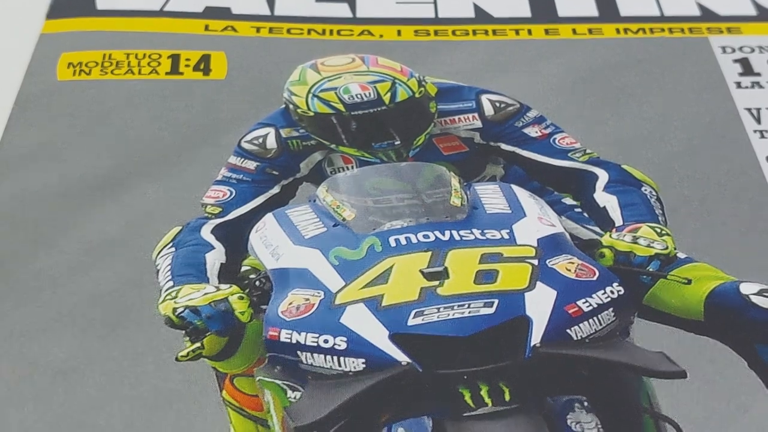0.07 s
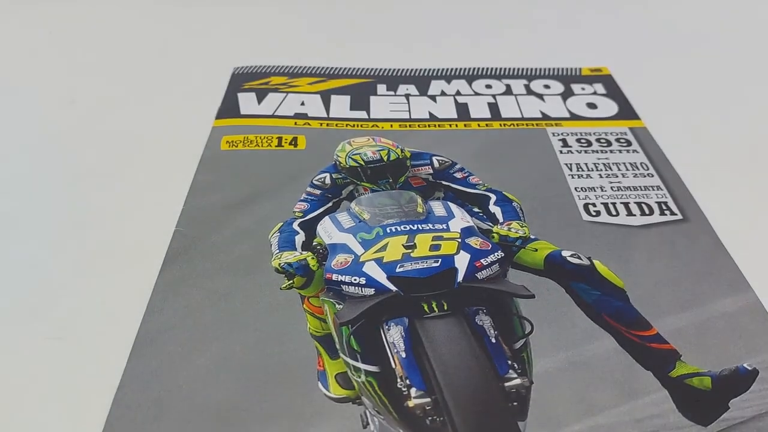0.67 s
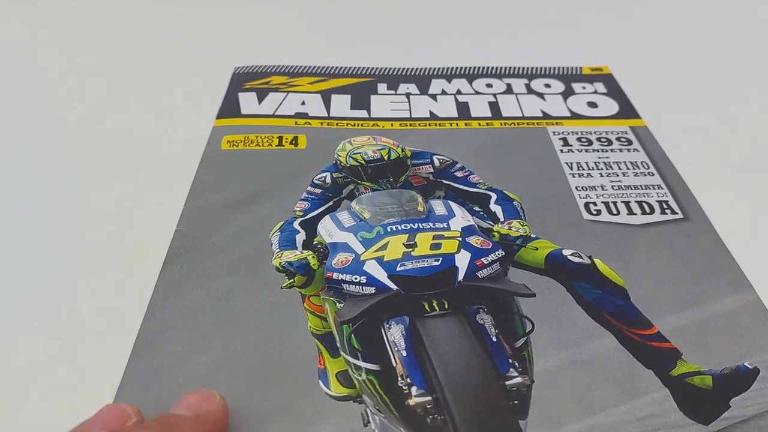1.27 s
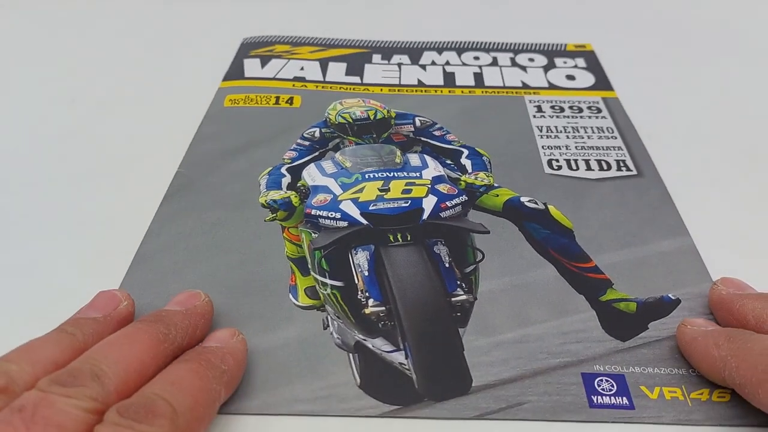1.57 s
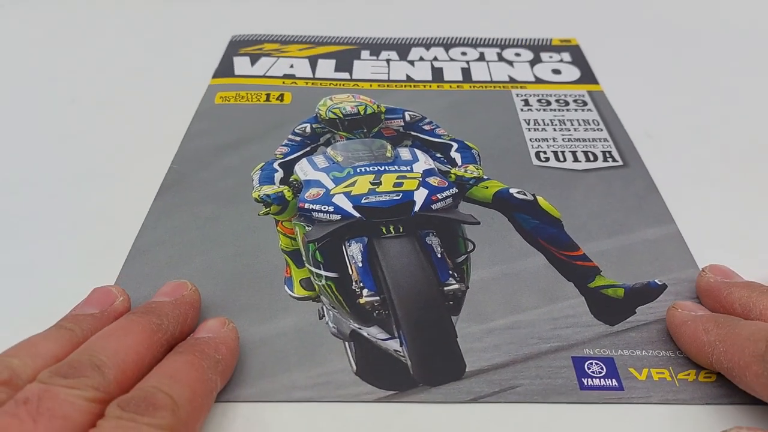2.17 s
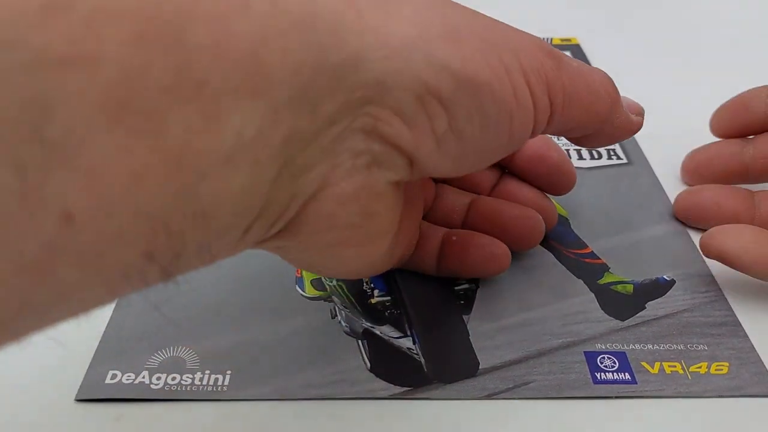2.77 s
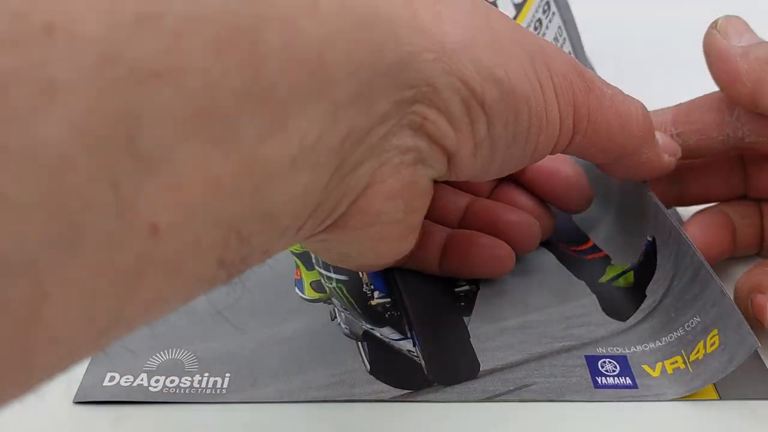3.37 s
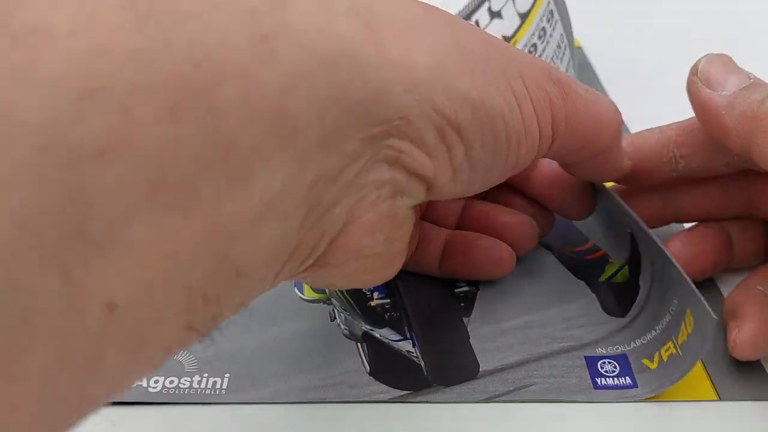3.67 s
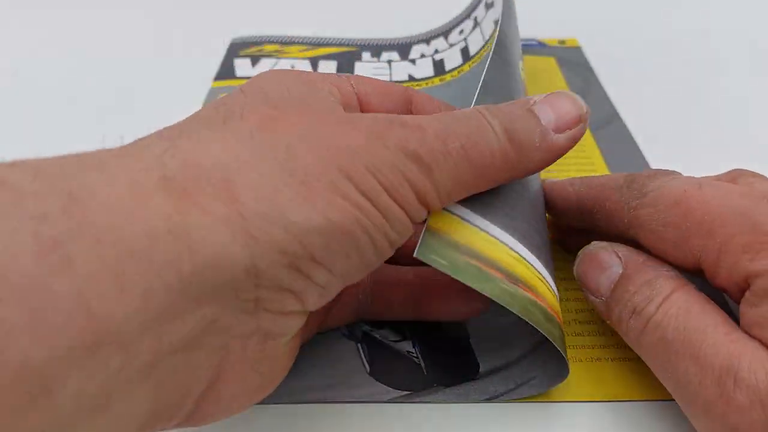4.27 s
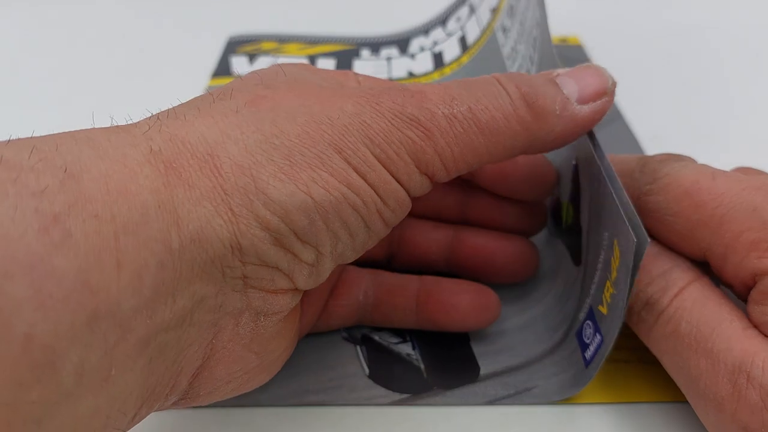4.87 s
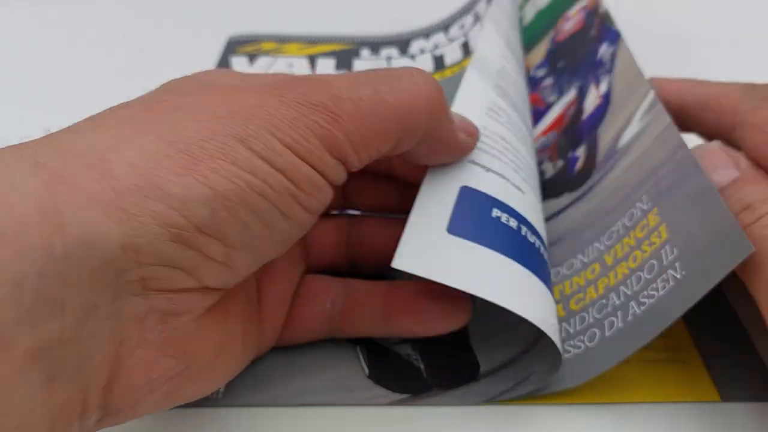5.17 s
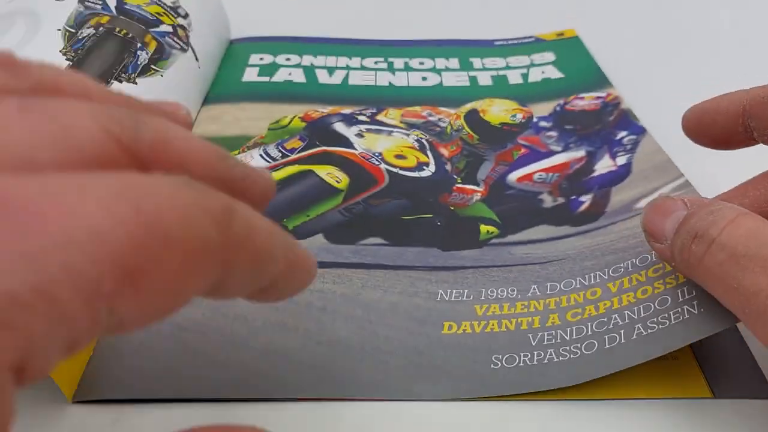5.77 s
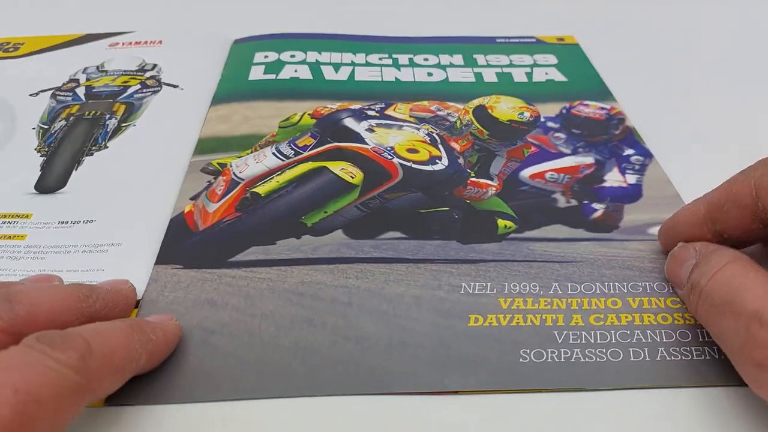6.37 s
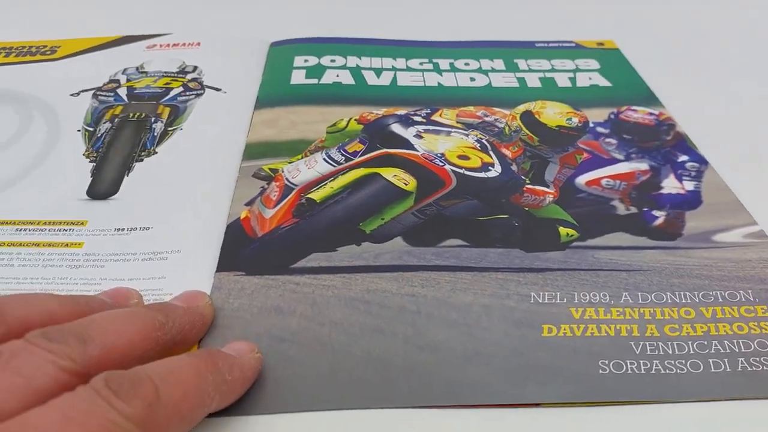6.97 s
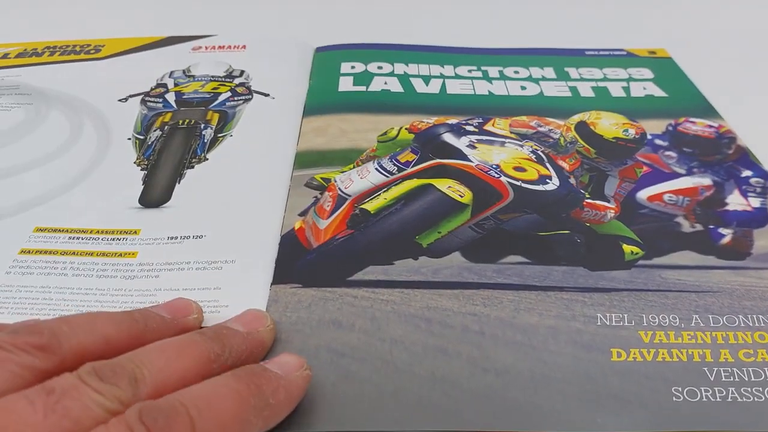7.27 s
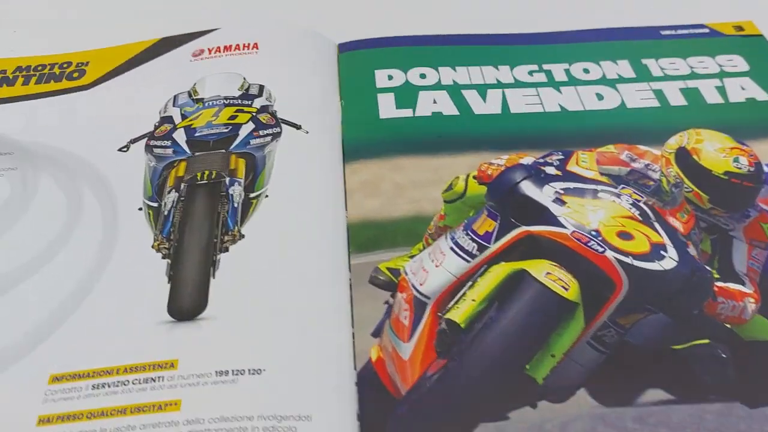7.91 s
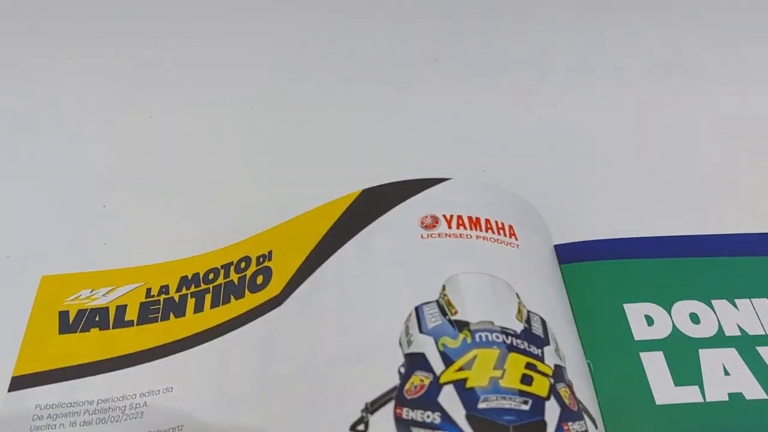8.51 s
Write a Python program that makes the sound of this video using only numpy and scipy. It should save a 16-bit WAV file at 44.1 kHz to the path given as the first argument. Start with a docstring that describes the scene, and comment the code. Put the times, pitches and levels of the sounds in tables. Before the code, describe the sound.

Hands slide over a glossy magazine and fold its cover open, with crisp crackles, papery flaps and soft table bumps.

```python
"""A small room, where a glossy magazine lies on a table close to two microphones.
Hands slide it into place, lift the stiff cover, bend it over and smooth it down. Stick-slip friction
makes skin hiss on the gloss and paper drag on the table. Buckling makes the sheet snap and flap,
and its edge ticks; each impulse excites damped modes. The hands bump the table top into low
vibration, over quiet air and a faint mains hum."""
import sys
import numpy as np
from scipy import signal
from scipy.fft import rfft, irfft, next_fast_len
from scipy.io import wavfile
from scipy.ndimage import uniform_filter1d

SR = 44100
rng = np.random.default_rng(int(sys.argv[2]) if len(sys.argv) > 2 else 0)


def store_wav(level_fs):
    """Save 16-bit WAV to argv[1]."""
    pcm = np.round(np.clip(np.atleast_2d(level_fs), -1, 1) * 32767)
    wavfile.write(sys.argv[1], SR, pcm.T.astype(np.int16))


N = 385786
TIME = np.arange(N) / SR
BODY_HZ, CRISP_HZ = 1135, 1980   # body tilts the two octaves below the first, crispness all above the second


def from_db(db):
    """Amplitude ratio of a level in decibels."""
    return 10 ** (np.asarray(db) / 20)


def unit_energy(x):
    """Normalisation of each channel to the energy of a unit impulse."""
    return x / np.sqrt(np.sum(x ** 2, axis=-1, keepdims=True) + 1e-20)


def panned(x, pan_db):
    """Level difference between the channels: pan is left minus right."""
    return x * from_db([[pan_db / 2], [-pan_db / 2]])


def add(out, s, sound):
    """Superposition of a sound that starts at time s."""
    start = round(s * SR)
    out[:, start:start + sound.shape[-1]] += sound[..., :N - start]


def colour(x, spectrum, body_db=0, crisp_db=0):
    """Minimum-phase (causal) filtering by a spectrum whose ends are tilted in dB per octave."""
    size = 2 * next_fast_len(x.shape[-1] // 2 + 2048)
    hz = np.maximum(np.arange(size // 2 + 1) * SR / size, 1)
    points_hz, points_db = np.transpose(spectrum)
    db = np.interp(np.log(hz), np.log(points_hz), points_db)
    db += body_db * np.clip(np.log2(BODY_HZ / hz), 0, 2)
    db += crisp_db * np.maximum(np.log2(hz / CRISP_HZ), 0)
    cepstrum = irfft(np.log(from_db(db)))[:size // 2]
    cepstrum[1:] *= 2
    return irfft(rfft(x, size) * np.exp(rfft(cepstrum, size)))[..., :x.shape[-1]]


def wander(rate, size):
    """Random modulation: interpolated Gaussian values, rate new ones a second."""
    return np.interp(np.arange(size) * rate / SR, np.arange(size // 8), rng.standard_normal(size // 8))


def stereo_noise(size, apart_hz=1300):
    """Coherence at spaced microphones: white noise, alike in the bass and unrelated in the treble."""
    mid, side = rng.standard_normal((2, size))
    lowpass = signal.butter(1, apart_hz, fs=SR)
    side = side - 0.21 * signal.lfilter(*lowpass, side)
    mid = mid + (np.sqrt(2) - 1) * signal.lfilter(*lowpass, mid)
    return np.array([mid + side, mid - side]) / np.sqrt(2)


# Spectrum of the room's background: (frequency [Hz], level [dB])
AIR_SPECTRUM = [(28, -68.5), (46, -30.5), (70, -43), (100, -36), (170, -51), (300, -52), (550, -64),
                (1000, -67), (3500, -78), (15000, -65)]


def room_air(hum_hz=100.2, hum_db=-65.5, swell_db=3, swells_per_s=2.8):
    """Ambient noise: hiss, rumble and mains hum, with slow amplitude modulation of the bass."""
    hum = from_db(hum_db) * np.sqrt(2) * np.sin(2 * np.pi * hum_hz * TIME)
    air = colour(stereo_noise(N), AIR_SPECTRUM) + hum
    bass = signal.lfilter(*signal.butter(1, 200, fs=SR), air)
    return air + bass * (from_db(swell_db * wander(swells_per_s, N)) - 1)


def reverberation(x, t60=0.17, db=-14.5):
    """Absorption in a furnished room leaves a weak diffuse tail that decays exponentially."""
    t = TIME[:SR // 2]
    tail = stereo_noise(len(t)) * from_db(-60 * t / t60) * (t > .008)
    tail = signal.lfilter(*signal.butter(1, 7000, fs=SR), unit_energy(tail))
    return from_db(db) * signal.fftconvolve(x, tail, axes=1)[:, :N]


# Reflections from nearby surfaces such as the table top and the hands: (left delay [s], right delay [s], gain
# [ratio])
REFLECTIONS = [(.0073, .0061, .22), (.0127, .0143, -.17)]


def early_reflections(x):
    """Interference with delayed copies comb-filters the sound differently at each microphone."""
    out, gains = x.copy(), [1]
    for *delays, gain in REFLECTIONS:
        out += gain * np.array([np.pad(side, (round(s * SR), 0))[:N] for side, s in zip(x, delays)])
        gains.append(gain)
    return out / np.linalg.norm(gains)


# Bearing of the moving paper: (time [s], lead of the left microphone [s])
LEFT_LEAD = [(1.4, -.0002), (4.2, .00018), (5.1, .00014), (5.5, .0004), (5.95, .00034), (6.25, .00006)]


def arrival_delay(x):
    """Path difference: the nearer microphone hears first, as the cover swings from right to left."""
    lead = np.round(SR * np.interp(TIME, *np.transpose(LEFT_LEAD))).astype(int)
    return np.array([x[0], x[1, np.clip(np.arange(N) - lead, 0, N - 1)]])


# Hands bump the table: (time [s], level [dB], frequency [Hz], T60 [s])
TABLE_BUMPS = [(0.907, -39.5, 59, 0.33), (1.368, -30.5, 48.3, 0.5), (1.415, -31, 100, 0.22),
               (2.396, -37, 90, .1), (2.601, -41, 53, 0.26), (5.517, -30, 106, 0.11),
               (5.935, -46.5, 83.5, 0.28), (6.449, -36.5, 59.3, 0.14), (6.832, -47, 75.4, 0.22),
               (7.403, -36, 112, 0.16), (7.474, -36, 68.5, 0.26), (7.535, -41, 55, 0.35),
               (8.201, -34, 105, 0.062)]


def table_bumps(rise=0.0048):
    """Damped free vibration: a soft hand sets the table top swinging at one low frequency."""
    out, t = np.zeros((2, N)), TIME[:SR // 2]
    onset = 1 - np.exp(-(t / rise) ** 2)
    for s, db, hz, t60 in TABLE_BUMPS:
        add(out, s, from_db(db - 60 * t / t60) * onset * np.sin(2 * np.pi * hz * t))
    return out


def snap(t, rise, t60, click_share=0.18, sharp_s=0.003, grain_db=2.0):
    """Impulsive excitation: a click, stronger for a quick rise, then scattered bending waves."""
    envelope = np.minimum(t / max(rise, 1 / SR), 1) ** 2 * from_db(-60 * np.maximum(t - rise, 0) / t60)
    waves = unit_energy(stereo_noise(len(t)) * envelope * from_db(grain_db * wander(910, len(t))))
    click = np.sinc((t - .0003) * SR)
    share = np.clip(click_share * np.exp(-rise / sharp_s), 0, 1)
    return np.sqrt(share) * click + np.sqrt(1 - share) * waves


def ringing(t, modes, rise):
    """Modal superposition: damped sinusoids, each with its own phase at each microphone."""
    decay_time = np.maximum(t - rise, 0)
    tones = 0
    for hz, db, t60 in modes:
        phase = 2 * np.pi * hz * t + np.pi * rng.random((2, 1))
        tones += from_db(db - 60 * decay_time / t60) * np.sin(phase)
    return tones * np.minimum(t / max(rise, 1 / SR), 1)


# Spectrum of a crack at the cover's edge: (frequency [Hz], level [dB])
EDGE_SPECTRUM = [(30, -31), (200, -28.5), (2500, -17), (3300, -30), (4500, 4), (5600, -4.5), (7800, 1.5),
                 (10000, -3), (15000, -9)]
# Modes of the edge: (frequency [Hz], level [dB], T60 [s])
EDGE_RESONANCES = [(3750, -43, .04), (4700, -40, .05), (5400, -38, .05), (6450, -41, .09),
                   (7900, -40, .055)]
# Ticks of the edge: (time [s], level [dB], T60 [s], pan [dB])
EDGE_TICKS = [(2.524, -3, 0.13, -1), (2.546, -12, .08, 3), (2.8717, 9, 0.051, 0)]


def edge_ticks(rise=0.00067):
    """Impulse response of the stiff edge: a bright crack leaves high modes ringing briefly."""
    out, t = np.zeros((2, N)), TIME[:SR // 3]
    for s, db, t60, pan_db in EDGE_TICKS:
        tick = colour(snap(t, rise, t60), EDGE_SPECTRUM) + ringing(t, EDGE_RESONANCES, rise)
        add(out, s, from_db(db) * panned(tick, pan_db))
    return out


# Spectrum of a snap in the sheet: (frequency [Hz], level [dB])
SHEET_SPECTRUM = [(25, -44), (170, -16.5), (270, -12), (430, -7.5), (700, -7.5), (1300, -3), (2000, -6),
                  (3000, -4.5), (4800, -3), (15000, -6)]
# Modes of the bent sheet: (frequency / ring pitch [ratio], level [dB], T60 [s])
BENT_SHEET_MODES = [(.82, -42, .07), (1, -36, .075), (1.13, -41, .06), (1.47, -44, .05), (2.05, -44, .04)]
# Mode of the stack of pages: (frequency [Hz], level [dB], T60 [s])
STACK_KNOCK = [(252.5, -57.5, 0.093)]


def sheet_jolt(rise, t60, body_db, crisp_db, ring_hz, ring_db):
    """Transient response: the paper snaps, its curve rings hollow and the pages below knock."""
    t = TIME[:SR // 3]
    modes = [(ratio * ring_hz, db, decay) for ratio, db, decay in BENT_SHEET_MODES]
    hollow = from_db(ring_db) * ringing(t, modes, rise)
    crack = colour(snap(t, rise, t60), SHEET_SPECTRUM, body_db, crisp_db)
    return crack + hollow + ringing(t, STACK_KNOCK, rise)


def crinkles(start, end, db, count=18):
    """Local buckling: tiny kinks form at random times as the cover bends."""
    out, t = np.zeros((2, N)), TIME[:SR // 10]
    for when, size, side in rng.random((count, 3)):
        kink = colour(snap(t, rise=0, t60=.05), SHEET_SPECTRUM)
        add(out, start + when * (end - start), from_db(db) * (.5 + size) * panned(kink, 10 * (side - .5)))
    return out


# Fingers pat the pages flat: (time [s], level [dB], crispness [dB/octave], pan [dB])
FINGER_PATS = [(0.888, -12, -2, 0), (0.939, -8, -5, -2), (0.996, -8.5, -7, -3), (1.397, -5, -8, 3),
               (1.411, -6, -9, -3), (5.816, -6, 3, 1.5), (5.992, -3.5, -1, 2), (6.23, 0.5, -1.5, 2.5),
               (6.2367, 7, -2.5, 0.5), (6.441, -15.5, 2, 2), (7.409, -20, -24, 5), (7.457, -14.5, 2, 0),
               (8.19, -8, -5, 2)]


def finger_pats():
    """Air displacement: soft fingers press a slow, full-bodied puff from under a page."""
    out = np.zeros((2, N))
    for s, db, crisp_db, pan_db in FINGER_PATS:
        puff = sheet_jolt(rise=0.0057, t60=0.12, body_db=8, crisp_db=crisp_db, ring_hz=1039, ring_db=-10)
        add(out, s, from_db(db) * panned(puff, pan_db))
    return out


# Kinks in the bent cover: (time [s], level [dB], body [dB/octave], crispness [dB/octave],
# ring pitch [Hz], ring level [dB], pan [dB])
COVER_KINKS = [(1.436, -3.5, -6, -3.5, 1170, -3, -4), (2.608, -4, -11, 4, 2610, -7, 3),
               (2.9351, 4, -0.5, 0.5, 2120, -1, -1), (2.9416, 3, 1.5, -0.5, 1650, -3.5, 0),
               (3.156, -7.5, -11, -3, 1730, -1, 1), (3.4295, -3, -12, -1, 1515, -6, -1),
               (3.778, 0, 4, -3.5, 1190, -9.5, -1), (4.2274, 9.5, -9, -4, 1265, -6, 4.5),
               (4.232, 8, -7, -0.5, 1460, 2, -2.5), (4.912, -10.5, -4, -1.5, 1206, -7, 0.5),
               (4.942, -8, -4, -1.5, 1400, -14, 0), (5.1015, 4.5, -21, 0, 1390, -8, 2),
               (5.115, 3, -2.5, -0.5, 1390, -13, 1), (5.4784, 6, -13, -4.5, 1790, -9, 4),
               (5.517, 0, 10, -2.5, 1520, -5, -2)]


def cover_kinks(rise=0.00096, t60=0.072):
    """Snap-through buckling: the cover jumps through a small kink with a short, crisp crack."""
    out = np.zeros((2, N))
    for s, db, *timbre, pan_db in COVER_KINKS:
        add(out, s, from_db(db) * panned(sheet_jolt(rise, t60, *timbre), pan_db))
    return out


# A wide part of the sheet flaps over or lands:
# (time [s], level [dB], rise [s], T60 [s], ring pitch [Hz], ring level [dB])
SHEET_FLAPS = [(4.3172, 10.5, 0.0004, 0.068, 1400, -8), (4.421, 15, 0.0005, 0.08, 1150, -8.5),
               (4.8448, -15.5, 0.00074, 0.15, 1130, 4.5), (5.318, 2.5, 0.00033, 0.12, 1040, -0.5),
               (5.485, 6.5, 0.011, 0.11, 1060, -14), (5.516, 12.5, 0.00095, 0.17, 413, -4.5),
               (5.533, 9, 0.012, 0.16, 1245, -4), (5.553, 14, 0.015, 0.2, 922, -7),
               (5.615, 6, 0.024, 0.18, 1040, -6.5), (5.927, 1, 0.0035, 0.092, 910, -2),
               (8.699, -4, 0.003, 0.37, 990, 7)]


def sheet_flaps(body_per_doubling=4.5, neutral_t60=0.1, dulling_per_s=457, top_hz=4040):
    """Radiation from a wide sheet: longer ringing goes with more body, slower contact with less treble."""
    out = np.zeros((2, N))
    for s, db, rise, t60, ring_hz, ring_db in SHEET_FLAPS:
        body_db = body_per_doubling * np.log2(t60 / neutral_t60)
        crisp_db = -10.5 - dulling_per_s * rise
        add(out, s, from_db(db) * sheet_jolt(rise, t60, body_db, crisp_db, ring_hz, ring_db))
    return signal.lfilter(*signal.butter(2, top_hz, fs=SR), out)


# A dragged sheet or fingertip rasps: (start [s], end [s], level [dB], pitch [Hz], nominal width [Hz])
SLIDING_RASPS = [(1.852, 1.878, -72, 2400, 300), (1.92, 2.07, -64, 1450, 700),
                 (3.068, 3.103, -55, 4610, 400), (3.104, 3.14, -53, 2560, 346),
                 (3.94, 4.069, -51.5, 1400, 400), (4.528, 4.68, -62.5, 1143, 130),
                 (5.257, 5.299, -43, 4170, 1300), (5.93, 6.0, -40, 1348, 300),
                 (6.036, 6.084, -47, 2200, 600), (6.761, 6.87, -57.5, 330, 200),
                 (6.8, 7.17, -54.5, 2030, 70), (7.369, 7.437, -55.5, 4050, 177),
                 (7.69, 7.83, -57, 250, 130), (8.2, 8.54, -42.5, 1680, 500),
                 (8.269, 8.345, -42.5, 4420, 1500), (8.35, 8.535, -40.5, 2380, 250),
                 (8.438, 8.507, -35.5, 6460, 1200), (8.452, 8.517, -39, 4580, 1000),
                 (8.699, 8.766, -46, 840, 298)]


def rasps(waver=0.0178, spread=0.63):
    """Friction drives one resonance of a free span of paper: narrow-band noise of straying pitch."""
    out = np.zeros((2, N))
    for start, end, db, hz, width in SLIDING_RASPS:
        size = max(round((end - start) * SR), 1024)
        lowpass = signal.butter(1, spread * width / 2, fs=SR, output="sos")
        amplitude = signal.sosfilt(lowpass, stereo_noise(size) + 1j * stereo_noise(size))
        pitch = hz * (1 + waver * wander(17.7, size))
        band = np.real(amplitude * np.exp(2j * np.pi * np.cumsum(pitch) / SR))
        add(out, start, from_db(db) * np.sqrt(size) * unit_energy(band) * signal.windows.tukey(size, .5))
    return out


def hand_echo(x, gain=0.54):
    """Moving comb filter: the hand reflects the rubbing from a changing distance."""
    delays = [.0022 + .0004 * wander(7, N) for side in x]
    echo = np.array([np.interp(TIME - delay, TIME, side) for side, delay in zip(x, delays)])
    return (x + gain * echo) / np.sqrt(1 + gain ** 2)


# Resonances of the rubbed sheet: (frequency [Hz], bandwidth [Hz], gain [ratio])
SPAN_MODES = [(1300, 350, 0.058), (2300, 330, .15), (4630, 1100, 0.15)]


def free_spans(x, swing_db=5, changes_per_s=9):
    """Changing boundary conditions: resonances come and go as fingers pin and free spans of the sheet."""
    out = x.copy()
    for hz, width, gain in SPAN_MODES:
        swing = from_db(swing_db * np.tanh(wander(changes_per_s, N)))
        out += gain * swing * signal.lfilter(*signal.iirpeak(hz, hz / width, fs=SR), x)
    return out


# Strokes of the hands and the sliding sheet:
# (start [s], speeding up [s], slowing down [s], skin level [dB], drag level [dB], shudder level [dB])
HAND_STROKES = [(0.03, 0.19, 0.081, -61, -54, -63), (0.55, 0.25, 0.14, -44.5, -52, -47.5),
                (0.91, 0.055, 0.1, -40, -46, -42), (1.035, 0.048, 0.058, -35.5, -45, -48),
                (1.16, 0.2, 0.1, -42, -47.5, -48.5), (1.35, 0.089, 0.19, -36, -38.5, -35),
                (1.929, 0.075, 0.082, -54, -56, -48), (2.04, 0.48, 0.08, -54.5, -56.5, -50),
                (2.44, 0.17, 0.092, -48, -46, -35.5), (2.62, 0.14, 0.27, -49.5, -49, -37.5),
                (2.9, 0.25, 0.34, -54.5, -47, -44.5), (3.33, 0.05, 0.48, -56, -48.5, -44),
                (3.69, 0.048, 0.12, -52.5, -45.5, -39.0), (3.86, 0.09, 0.2, -42.5, -39.5, -40.5),
                (4.09, 0.06, 0.17, -49, -42.5, -43), (4.239, 0.025, 0.05, -36.5, -35, -35),
                (4.364, 0.028, 0.04, -42.5, -34, -36), (4.53, 0.048, 0.065, -51, -44, -45.5),
                (5.1, 0.18, 0.046, -40, -38, -37.5), (5.3, 0.25, 0.31, -46, -47.5, -37),
                (5.47, 0.061, 0.18, -52.5, -57, -31), (5.809, 0.016, 0.11, -34.5, -38, -38.5),
                (5.87, 0.082, 0.054, -32.5, -34.5, -50), (5.925, 0.038, 0.042, -38, -33, -26),
                (5.99, 0.062, 0.06, -45, -42, -30), (6.04, 0.33, 0.18, -50.5, -48.5, -44),
                (6.509, 0.44, 0.14, -40, -47, -39), (6.825, 0.048, 0.13, -41, -33, -55),
                (6.969, 0.11, 0.093, -40.5, -36, -43), (7.12, 0.085, 0.098, -41.5, -36, -43),
                (7.2, 0.15, 0.2, -50, -55.5, -51.5), (7.52, 0.08, 0.22, -46, -46.5, -43),
                (7.55, 0.54, 0.9, -41.5, -50.5, -41.5), (7.89, 0.086, 0.06, -38, -50.5, -50),
                (8.21, 0.094, 0.069, -50, -31, -39.5), (8.35, 0.08, 0.11, -52, -31.5, -31),
                (8.432, 0.049, 0.076, -39, -22.5, -32), (8.589, 0.065, 0.069, -38, -36.5, -34.5)]


def stroke_gains(creep_s=0.22, creep_db=-11.5, creep_limit_db=-40):
    """Friction amplitude follows sliding speed; overlapping strokes add in power."""
    power = np.zeros((3, N))
    for start, rise, fall, *levels_db in HAND_STROKES:
        during = (TIME > start) & (TIME < start + rise + fall)
        speed = np.sin(np.pi / 2 * np.interp(TIME[during] - start, [0, rise, rise + fall], [0, 1, 0]))
        power[:, during] += np.outer(from_db(levels_db), speed) ** 2
    # the fingers creep on lightly before and after each stroke
    creep = uniform_filter1d(np.minimum(power, from_db(creep_limit_db) ** 2), round(creep_s * SR), axis=1)
    return np.sqrt(power + from_db(creep_db) ** 2 * np.abs(creep))


def friction(spectrum, gain, slips_per_s, slip_share, judder_hz, judder_db):
    """Stick-slip friction: a wash of tiny slips and some larger ones, modulated by an uneven grip."""
    slips = np.sqrt(N) * unit_energy((rng.random(N) < slips_per_s / SR) * stereo_noise(N))
    force = np.sqrt(1 - slip_share) * stereo_noise(N) + np.sqrt(slip_share) * slips
    grip = from_db(judder_db * wander(judder_hz, N))
    return colour(force * gain * grip, spectrum)


# Friction spectra of skin on gloss, dragged paper and the shuddering sheet: (frequency [Hz], level [dB])
SKIN_SPECTRUM = [(100, -8.5), (700, -21), (2000, -14.5), (3300, -15.5), (5000, -7), (10000, -2.5),
                 (15000, -0.5)]
DRAG_SPECTRUM = [(100, -25.5), (700, -15), (1300, -8), (1700, -6.5), (2300, -2), (3100, -4), (4600, -3),
                 (7000, -9), (10000, -10.5), (15000, -21)]
SHUDDER_SPECTRUM = [(25, -45), (70, 1.5), (180, -6), (270, -3), (620, -8), (1000, -6.5), (1450, -5),
                    (2500, -12.5), (6000, -35), (15000, -31)]


def rubbing():
    """Sliding friction: skin hisses on gloss, paper drags on paper and table, and the sheet shudders."""
    skin_gain, drag_gain, shudder_gain = stroke_gains()
    skin = friction(SKIN_SPECTRUM, skin_gain,
                    slips_per_s=2500, slip_share=0.13, judder_hz=87.4, judder_db=1.34)
    drag = friction(DRAG_SPECTRUM, drag_gain,
                    slips_per_s=1500, slip_share=0.2, judder_hz=45.16, judder_db=2.5)
    shudder = friction(SHUDDER_SPECTRUM, shudder_gain,
                       slips_per_s=600, slip_share=0.35, judder_hz=79.1, judder_db=2.0)
    return free_spans(hand_echo(skin + drag)) + shudder


def scene():
    """Superposition of the paper, its reflections, the table and the ambient noise."""
    paper = rubbing() + crinkles(start=2.65, end=3.7, db=-22) + rasps()
    paper = paper + cover_kinks() + sheet_flaps() + finger_pats() + edge_ticks()
    paper = early_reflections(arrival_delay(paper))
    return paper + reverberation(paper) + table_bumps() + room_air()


# Difference between the microphones: (frequency [Hz], left minus right [dB])
MIC_BALANCE = [(120, 1), (250, 3), (500, -1), (1200, 1), (4500, 2), (8500, -1), (13000, -3)]
# Response common to both: (frequency [Hz], level [dB])
MIC_RESPONSE = [(7800, -0.5), (9000, -5.5), (10500, -5), (12000, -0.5), (16000, -7)]


def record(dry, cutoff_hz=16100):
    """Frequency response: each microphone has its own colour, both dip in the treble; the top is cut."""
    sides = [colour(x, [(hz, sign * db / 2) for hz, db in MIC_BALANCE]) for x, sign in zip(dry, (1, -1))]
    lowpass = signal.ellip(12, .1, 80, cutoff_hz, fs=SR, output="sos")
    return signal.sosfilt(lowpass, colour(np.array(sides), MIC_RESPONSE))


dry = scene()
out = record(dry)
store_wav(out)
```